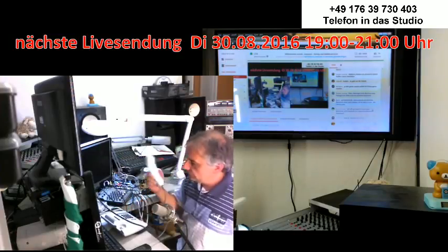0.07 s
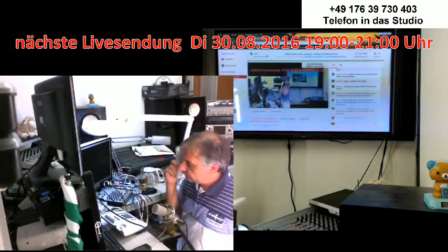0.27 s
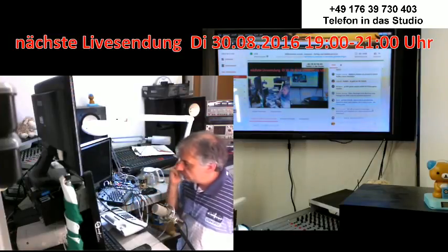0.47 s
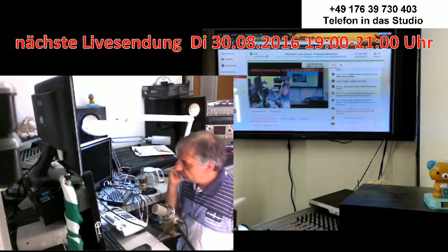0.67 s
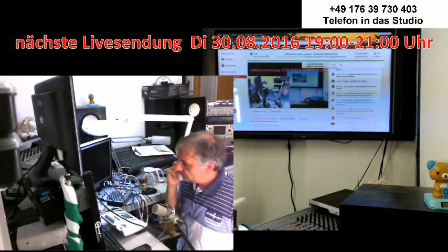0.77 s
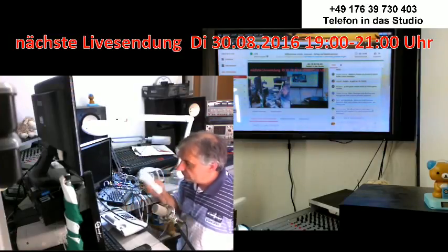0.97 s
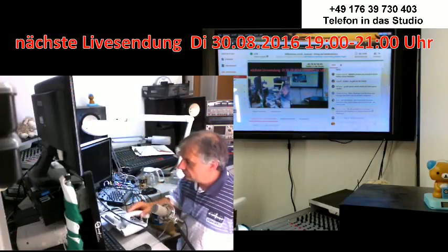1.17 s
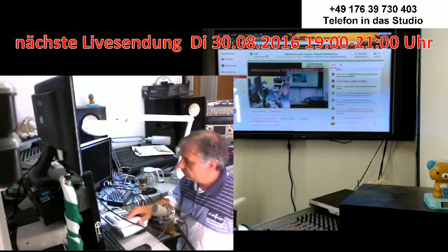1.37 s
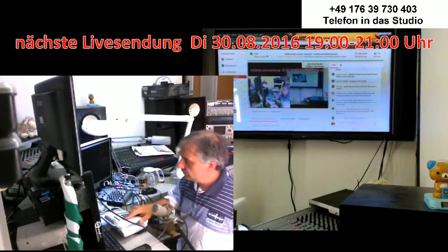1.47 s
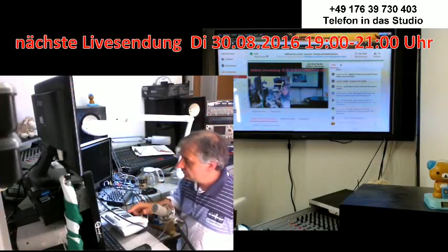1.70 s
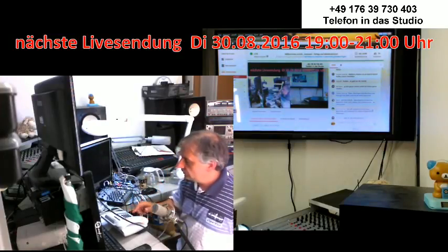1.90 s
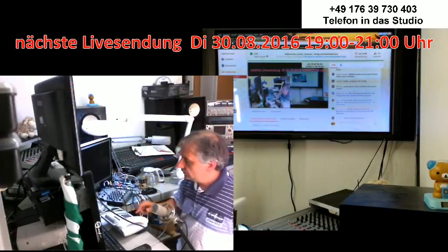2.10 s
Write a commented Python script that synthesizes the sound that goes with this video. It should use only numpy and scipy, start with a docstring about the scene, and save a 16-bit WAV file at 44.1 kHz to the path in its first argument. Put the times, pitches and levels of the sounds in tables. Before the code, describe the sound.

A plastic telephone handset clatters down onto a desk, bouncing and rattling briefly to rest.

```python
"""Ticks and creaks of a plastic telephone handset in the hand, close by in a quiet studio room.
It is then set down, bounces and rattles to rest; the desk thuds and the fingers slide off.
Contacts sum decaying modes and a noise crack, and excite a diffuse room tail; the desk rings and thumps.
Filtered noise makes the rubbing, the draught and the fans' rush; steady sines make their faint hum."""
import sys
import numpy as np
from scipy import signal
from scipy.fft import rfft, irfft
from scipy.io import wavfile

SR = 44100
rng = np.random.default_rng(int(sys.argv[2]) if len(sys.argv) > 2 else 0)


def to_wav(s):
    """Save 16-bit WAV."""
    ch = np.atleast_2d(s).T  # columns
    pcm = np.round(np.clip(ch, -1, 1) * 32767)  # PCM
    wavfile.write(sys.argv[1], SR, pcm.astype(np.int16))


N = 94594

# frequency bands that share out contact levels and room decay: low_hz, high_hz
BANDS = [(120, 620), (620, 1200), (1200, 2500), (2500, 5500), (5500, 17000)]


def from_db(db):
    """Amplitude gain is ten to the power of decibels over twenty."""
    return 10 ** (np.asarray(db) / 20)


def rms(x):
    """Root mean square: the square root of mean power, kept above zero."""
    return np.sqrt(np.mean(x ** 2) + 1e-20)


def at_hz(points, hz):
    """Spectral interpolation, linear in value along a logarithmic frequency axis."""
    point_hz, value = np.transpose(points)
    return np.interp(np.log(np.maximum(hz, 1)), np.log(point_hz), value)


def level(curve):
    """Amplitude envelope: (time_s, level_db) points, interpolated in decibels, as a gain per sample."""
    return from_db(np.interp(np.arange(N) / SR, *np.transpose(curve)))


def fade(t, t60):
    """Exponential damping: amplitude falls 60 dB in t60 seconds."""
    return np.exp(-np.log(1000) * t / t60)


def band(x, low_hz, high_hz):
    """Causal band-pass filtering with a Butterworth response."""
    band_pass = signal.butter(2, [low_hz, high_hz], "band", fs=SR, output="sos")
    return signal.sosfilt(band_pass, x)


def noise(colour, size):
    """Spectral shaping: white noise weighted by a (frequency_hz, level_db) colour, then set to rms 1."""
    spectrum = rfft(rng.standard_normal(size))
    gain = from_db(at_hz(colour, np.fft.rfftfreq(size, 1 / SR)))
    x = irfft(spectrum * gain, size)
    return x / rms(x)


def add(out, s, sound):
    """Superposition: mix a sound in at time s, cut at the end of the scene."""
    i = int(s * SR)
    out[i:i + len(sound)] += sound[:N - i]


def contacts(rows, modes, crack_db, crack_s):
    """Impact excitation: each contact rings the modes and cracks anew, its place and force set by band levels."""
    # crack of the contact, crowded short-lived modes heard as noise: frequency_hz, relative_level_db
    crack_colour = [(200, -16), (500, -6), (1000, -7), (2000, -2), (4000, 2.5), (5400, -3), (8500, -1.5),
                    (10500, -8), (16000, -13.5)]
    snap_db, snap_s = 4, .0076  # first instant: level over the rest of the crack, and its t60
    scatter_db, detune = 1.5, .012  # standard deviations: mode level, and mode frequency as a fraction
    attack_samples = int(.005 * SR)  # the opening over which band levels are set
    out, t = np.zeros(N), np.arange(4096) / SR
    hz, mode_db, t60 = np.transpose(modes)[:, :, None]
    crack = from_db(crack_db) * (fade(t, crack_s) + from_db(snap_db) * fade(t, snap_s))
    for s, *band_levels in rows:
        strength, shift, side = rng.standard_normal((3, len(hz), 1))
        amplitude = np.sign(side) * from_db(mode_db + scatter_db * strength)
        ring = amplitude * np.sin(2 * np.pi * hz * (1 + detune * shift) * t) * fade(t, t60)
        blow = ring.sum(axis=0) + crack * noise(crack_colour, len(t))
        direct = 0
        # from the top band down, so that rows of four levels fill the upper four bands
        for k, (edges, db) in enumerate(zip(BANDS[::-1], band_levels[::-1])):
            part = band(blow, *edges)
            polarity = (-1) ** k  # neighbouring bands alternate in sign
            direct = direct + polarity * from_db(db) * part / rms(part[:attack_samples])
        add(out, s, direct)
        add(out, s, room(direct))
    return out


def set_down():
    """Modal impact: the handset knocks and settles on its seat, then fingers nudge it and let go."""
    # knocks as it lands and rattles: start_s, then level_db in each of the five BANDS
    knocks = [(1.0972, -59.5, -54.5, -40, -50, -56.5), (1.164, -11, -28.5, -12, -21.5, -23.5),
              (1.1942, -27.5, -15.5, -20, -21.5, -32), (1.2375, -42, -33, -52.5, -34, -44),
              (1.2776, -40.5, -31.5, -27, -26, -37), (1.2873, -23, -22, -26.5, -27.5, -43.5),
              (1.3026, -33, -17.5, -28.5, -23, -30.5), (1.312, -29, -30.5, -35, -45.5, -55),
              (1.320, -26.5, -33.5, -27.5, -25, -34.5), (1.3239, -24.5, -19.5, -29, -16.5, -32),
              (1.3295, -27.5, -34.5, -34.5, -40, -38.5)]
    # nudges of the fingers: start_s, then level_db in each of the five BANDS
    nudges = [(1.424, -43.5, -55, -68, -71, -74), (1.491, -49, -55.5, -54.5, -72, -71),
              (1.535, -43, -45, -55.5, -75, -65), (1.545, -48.5, -54, -54.5, -82, -90),
              (1.559, -39.5, -46, -62, -80, -91), (1.584, -65, -55, -57, -64.5, -91),
              (1.594, -55, -57, -64.5, -87, -87)]
    # modes of the handset against its seat: frequency_hz, relative_level_db, t60_s
    seat_modes = [(300, -6, 0.049), (420, -5.5, 0.084), (479, 6.5, 0.034), (652, -10.5, .04),
                  (748, -3.5, 0.043), (898, -0.5, 0.022), (991, -0.5, 0.023), (1419, 3, 0.027),
                  (1559, -1.5, 0.072), (1791, -4, 0.08), (2435, -8, 0.017), (2964, 6, .028),
                  (3500, 2, 0.02), (4230, -0.5, .018)]
    knocking = contacts(knocks, seat_modes, crack_db=9, crack_s=.044)
    nudging = contacts(nudges, seat_modes, crack_db=22.5, crack_s=.052)
    return knocking + nudging


def in_hand():
    """Damped modal ringing: the held shell ticks in the grip and fingers scuff over it."""
    # ticks of the shell: start_s, then level_db in each of the upper four BANDS
    ticks = [(.052, -52.5, -44, -46.5, -47), (.0865, -50.5, -54, -48, -62), (.1258, -46, -36.5, -43, -54),
             (.222, -65, -52.5, -75, -67), (.277, -71, -68, -65.5, -87), (.536, -63, -86, -70, -69.5),
             (.818, -61.5, -59.5, -55.5, -51), (.909, -68, -56.5, -54.5, -66.5),
             (.943, -54, -67, -59.5, -66), (.989, -46.5, -49, -50.5, -51),
             (1.0085, -56.5, -50.5, -49.5, -51), (2.113, -69, -98, -72, -83)]
    # scuffs of the fingers: start_s, then level_db in each of the upper four BANDS
    scuffs = [(.011, -63, -55.5, -68, -63.5), (.311, -62.5, -59.5, -78, -70.5),
              (.407, -59.5, -57.5, -63, -65.5), (.480, -54, -72, -63, -88), (.772, -68, -62.5, -85, -75)]
    # modes of the shell in the hand: frequency_hz, relative_level_db, t60_s
    shell_modes = [(1170, -8.5, 0.022), (1630, -2.5, 0.022), (2000, 9.5, 0.015), (2850, -9, .014),
                   (4350, 3, 0.0096), (6700, -9, 0.013)]
    ticking = contacts(ticks, shell_modes, crack_db=5, crack_s=.032)
    scuffing = contacts(scuffs, shell_modes, crack_db=7, crack_s=.125)
    return ticking + scuffing


def desk():
    """Forced excitation of a panel: each press of weight sets the desk thumping and ringing."""
    # weight coming down on the desk: start_s, relative_level_db
    presses = [(1.163, -20), (1.212, -27), (1.3021, -26), (1.333, -29.5), (1.422, -37), (1.545, -36.5)]
    # modes of the desk under the weight: frequency_hz, relative_level_db, t60_s
    desk_modes = [(48.5, -4, 0.41), (72, -6.5, 0.081), (400, -10, 0.42)]
    # spectrum of the dull thump: frequency_hz, relative_level_db
    thump_colour = [(15, -14), (40, 0), (80, 10), (110, 0), (200, -10.5), (500, -42.5)]
    out, t = np.zeros(N), np.arange(SR) / SR
    ring = sum(from_db(db) * np.sin(2 * np.pi * hz * t) * fade(t, t60) for hz, db, t60 in desk_modes)
    for s, db in presses:
        thump = from_db(-9.5) * noise(thump_colour, SR) * fade(t, .2)
        add(out, s, from_db(db) * (ring + thump))
    return out


def arm():
    """Friction and turbulence as noise: soft rubbing of skin and cord, and air stirred by the arm."""
    # loudness of the rubbing: time_s, level_db
    rub_level = [(0, -57), (.03, -74), (.05, -64.5), (.16, -63), (.25, -71.5), (.65, -73.5), (.9, -70),
                 (1.04, -66), (1.13, -79), (1.5, -64.5), (1.65, -75)]
    # spectrum of the rubbing: frequency_hz, relative_level_db
    rub_colour = [(200, -7), (2000, 0.5), (5000, -7.5), (9000, -19), (16000, -6)]
    # loudness of the draught: time_s, level_db
    draught_level = [(0, -47), (.1, -66), (.4, -61), (.49, -52.5), (.6, -72), (.88, -74), (.96, -49.5),
                     (1.02, -39.5), (1.15, -45.5), (1.65, -50), (1.85, -72)]
    rubbing = level(rub_level) * noise(rub_colour, N)
    air = band(rng.standard_normal(N + SR), 10, 20)[SR:]  # drop the second in which the filter settles
    return rubbing + level(draught_level) * air / rms(air)


def reflections(x):
    """Specular reflection: nearby screens and walls throw the treble back after a delay."""
    # early reflections: delay_s, level_db
    echoes = [(0.0178, -20.5), (.029, -21)]
    # limits of the reflected treble: low_hz, high_hz
    treble_limits = (1512, 10990)
    out, treble = np.zeros(N), band(x, *treble_limits)
    for delay_s, db in echoes:
        add(out, delay_s, from_db(db) * treble)
    return out


def room(x):
    """Diffuse reverberation: a short tail of noise decays band by band, drawn anew for each contact."""
    # the tail in each of the five BANDS: level_db, t60_s
    tail_bands = [(-19, 0.65), (-9.5, 0.15), (-13.5, 0.25), (-19, 0.23), (-18.5, 0.42)]
    onset_s = .004  # silence before the tail, and then the length of its rise
    t, tail = np.arange(SR // 2) / SR, 0
    onset = np.clip(t / onset_s - 1, 0, 1)
    for (low, high), (db, t60) in zip(BANDS, tail_bands):
        part = band(rng.standard_normal(len(t)) * fade(t, t60) * onset, low, high)
        # level is relative to an ideal filter passing this band at unit gain
        unit_energy = np.sqrt(2 * (high - low) / SR / np.sum(part ** 2))
        tail = tail + from_db(db) * part * unit_energy
    return signal.fftconvolve(x, tail)


def fans():
    """Stationary noise and tones: the equipment's steady rush, with its hum and a thin whine."""
    # spectrum of the rush: frequency_hz, relative_level_db
    rush_colour = [(15, -29.5), (25, 1), (58, 1), (103, -5), (121, -20), (138, 2.5), (172, -8.5),
                   (252, -5.5), (433, -6.5), (470, -9), (687, -14), (1060, -15.5), (1180, -14),
                   (1280, -19.5), (1980, -25.5), (12600, -39.5), (16500, -43.5)]
    # steady tones of hum and whine: frequency_hz, relative_level_db
    tones = [(150.7, -67), (247.6, -67.5), (780.6, -74), (1093, -71), (1249, -66), (1405, -73)]
    rush_db, tones_db = -61.5, -4.5  # rms level of the rush; gain on all the tones
    t, hum = np.arange(N) / SR, np.zeros(N)
    for hz, db in tones:
        amplitude = from_db(db + tones_db) * np.sqrt(2)  # peak of a sine from its rms
        hum += amplitude * np.sin(2 * np.pi * (hz * t + rng.random()))
    return from_db(rush_db) * noise(rush_colour, N) + hum


def scene():
    """Linear superposition of handset, desk, arm and fans; the setting down also reflects."""
    landing = set_down()
    return (landing + reflections(landing) + in_hand() + desk() + arm() + fans())[None]


def record(dry):
    """Saturation rounds off the hardest peaks, then a steep elliptic low-pass cuts the top."""
    overload, cutoff_hz = .78, 15750  # overload: the amplitude that peaks approach
    held = dry / (1 + (dry / overload) ** 4) ** (1 / 4)
    low_pass = signal.ellip(10, .1, 80, cutoff_hz, fs=SR, output="sos")
    return signal.sosfilt(low_pass, held)


dry = scene()
out = record(dry)
to_wav(out)
```